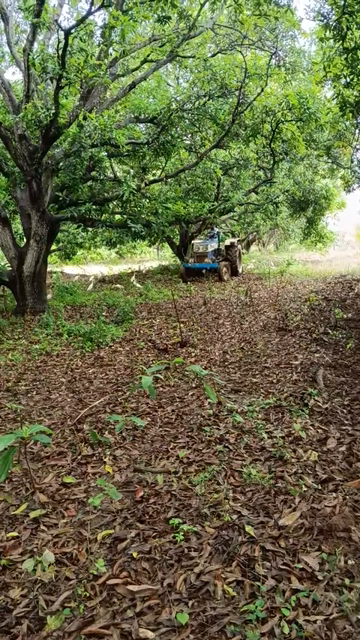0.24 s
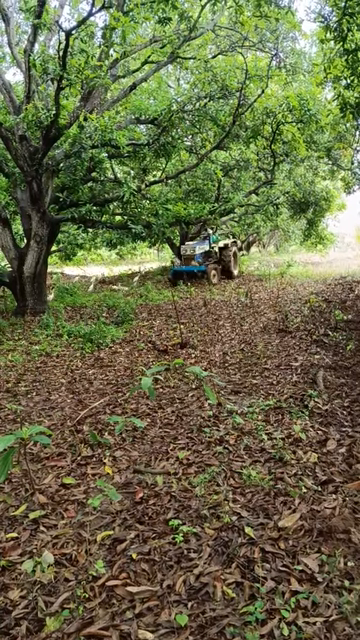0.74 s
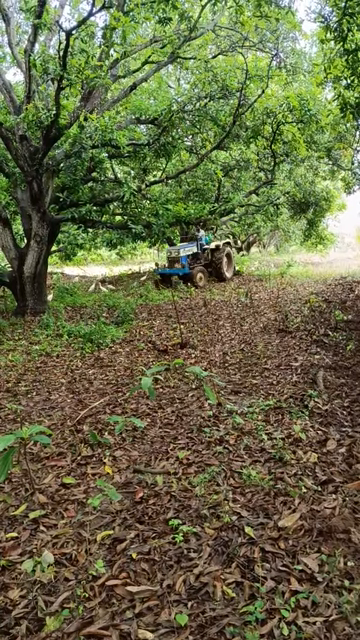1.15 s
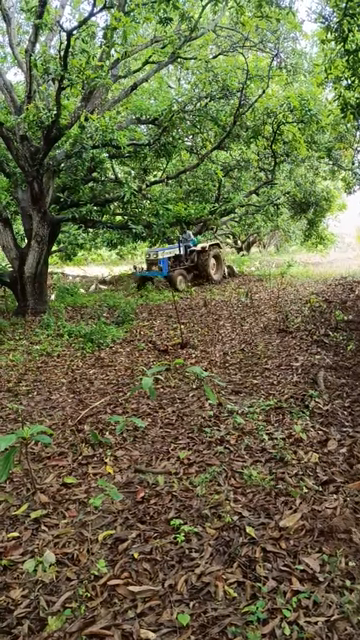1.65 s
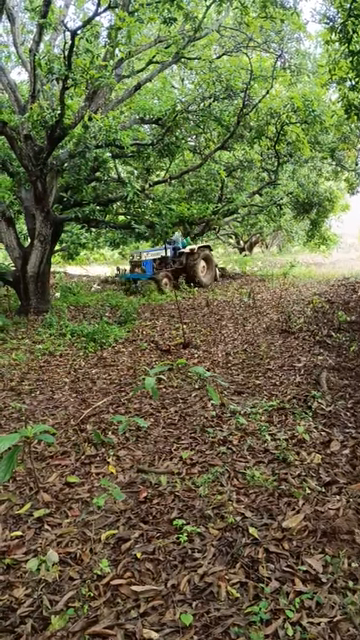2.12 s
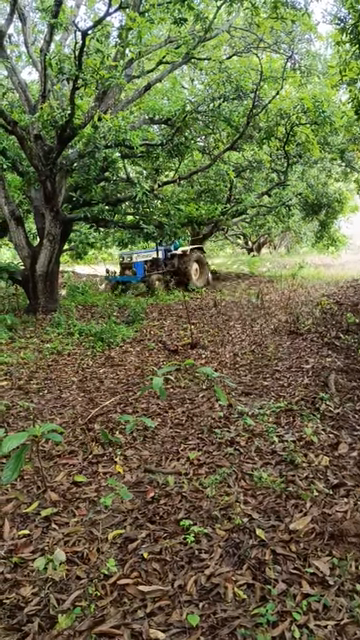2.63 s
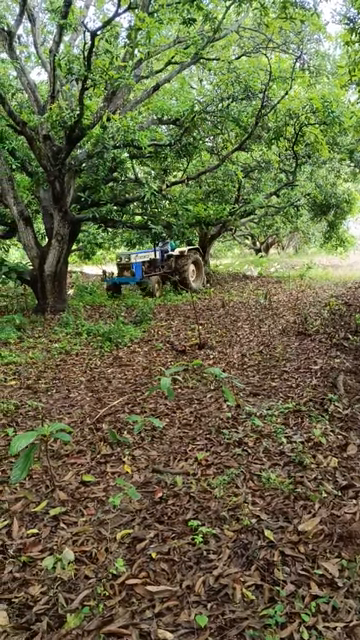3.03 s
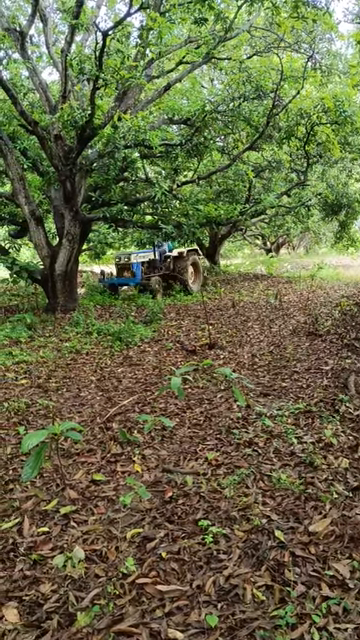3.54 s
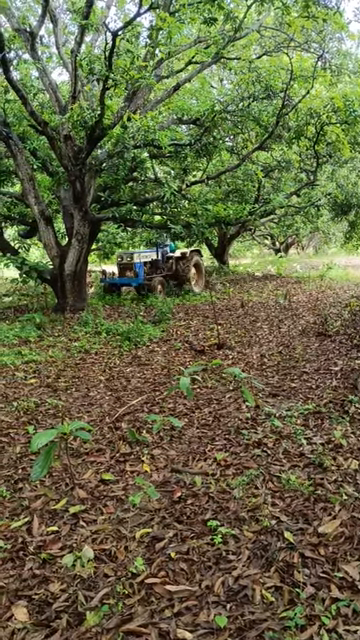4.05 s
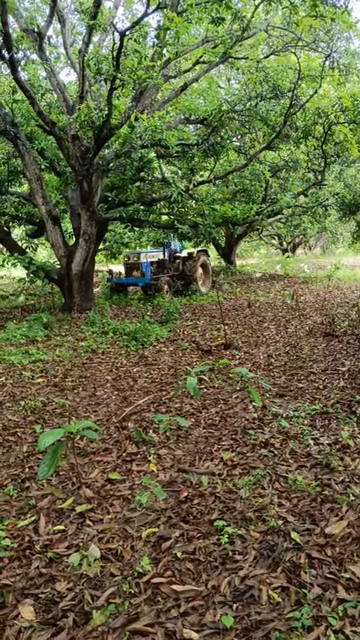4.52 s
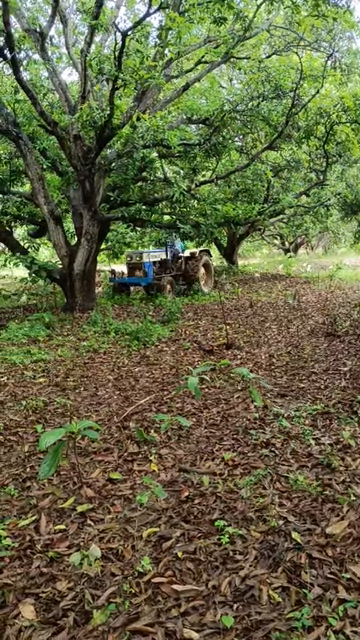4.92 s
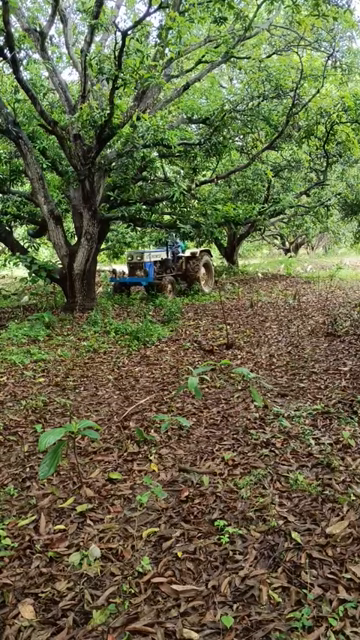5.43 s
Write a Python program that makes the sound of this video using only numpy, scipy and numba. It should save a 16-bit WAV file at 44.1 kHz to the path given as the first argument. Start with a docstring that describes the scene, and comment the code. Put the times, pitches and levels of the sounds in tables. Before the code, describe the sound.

A diesel tractor works under trees, heard in stereo from a distance on a phone. Loud knocking and a slowing, recovering exhaust beat open it; the engine then hunts in pulses, panels buzz, earth rumbles and a gritty crunch bursts midway. Last hard knocks come before the load releases, leaving a weaker steady throb, fan and valve rustle, and one dry twig tick.

```python
"""A small diesel tractor works under orchard trees some way off, heard through a phone's two microphone ports.
It opens in a hard pull: the exhaust throbs in clean orders of a sagging firing rate, hard knocks ring the block,
and the engine clatters brightly. It turns side-on, the governor hunts, and discs turn the earth with thumps,
buzzing panels and one wide crunch. Then the load drops: the knock fades out, the throb weakens, running gear rustles
on, and a twig ticks. Orders are swept sines; the rest is noise, impulses through resonances, and short decaying sines."""
import sys
import numpy as np
from scipy import signal
from scipy.fft import rfft, irfft
from scipy.io import wavfile
from scipy.ndimage import uniform_filter1d
from numba import njit

SR = 44100
rng = np.random.default_rng(int(sys.argv[2]) if len(sys.argv) > 2 else 0)


def generate_wav(signal):
    """Clip the signal to [-1, 1] and save it as 16-bit WAV at the path in sys.argv[1]."""
    frames = np.transpose(np.atleast_2d(signal))
    scaled = np.clip(frames, -1, 1) * 32767
    pcm = np.round(scaled).astype(np.int16)
    wavfile.write(sys.argv[1], SR, pcm)


N = 250047


def undb(db):
    """Decibels to an amplitude factor."""
    return 10 ** (np.asarray(db) / 20)


def seconds():
    """The time of every sample."""
    return np.arange(N) / SR


def curve(table):
    """Columns of a (seconds, value, ..) table, drawn as straight lines with one value a sample."""
    s, *columns = np.transpose(table)
    return [np.interp(seconds(), s, column) for column in columns]


def ramp(span):
    """0 before the span, 1 after it."""
    return np.interp(seconds(), span, (0, 1))


def on_bins(table, column=1):
    """One column of a (Hz, ..) table on the transform bins, along log frequency."""
    rows = np.array(table, float)
    bins_hz = np.fft.rfftfreq(N, 1 / SR)
    return np.interp(np.log(bins_hz + 1), np.log(rows[:, 0]), rows[:, column])


def unit(x):
    """Scale to rms 1."""
    return x / np.sqrt(np.mean(x ** 2))


def colour(x, table):
    """Filter with a (Hz, dB) outline; rms 1."""
    return unit(irfft(rfft(x) * undb(on_bins(table)), N))


def ring(x, hz, width_hz):
    """One fixed resonance, gain 1 at its centre."""
    return signal.lfilter(*signal.iirpeak(hz, hz / width_hz, SR), x)


def steep_ring(x, hz, width_hz):
    """The same resonance twice over, for steeper skirts."""
    return ring(ring(x, hz, width_hz), hz, width_hz)


@njit
def glide(x, hz, width_hz):
    """State-variable band-pass whose centre moves every sample."""
    y, b, l = np.empty(len(x)), 0., 0.
    for i in range(len(x)):
        g, k = np.tan(np.pi * hz[i] / SR), width_hz / hz[i]
        v = (b + g * (x[i] - l)) / (1 + g * (g + k))
        b, l, y[i] = 2 * v - b, l + 2 * g * v, k * v
    return y


def part(x, hz, width_hz):
    """A steep moving resonance on each path; rms 1."""
    width_hz = float(width_hz)
    return unit(np.array([glide(glide(path, hz, width_hz), hz, width_hz) for path in np.atleast_2d(x)]))


def walk(rate):
    """Random levels held 1 / rate s and slewed twice; spread near 1."""
    k = int(SR / rate)
    steps = np.repeat(rng.standard_normal(N // k + 1), k)
    return 1.3 * uniform_filter1d(uniform_filter1d(steps, k), k)[:N]


def noise():
    """Two unrelated noises: the path straight ahead and the scatter off trunks and ground."""
    return rng.standard_normal((2, N))


def grains(spread_db):
    """Noise broken into 1.2 ms grains of unequal size."""
    k = int(.0012 * SR)
    size = np.repeat(rng.exponential(size=N // k + 1), k)[:N]
    return noise() * undb(spread_db * size)


# The governor cuts fuel, then lets it surge. Each row: cut in seconds, exhaust cut in dB, exhaust surge in dB,
# knock cut in dB, knock surge in dB; the exhaust figures are swings that each order takes a share of.
FUEL_HUNT = [(-.2, -11, 2, -24, -28.5), (1.057, -5, 2, -28, -27), (1.27, -1.5, -0.5, -28.5, -29.5),
             (1.492, -10, -1, -48, -25.5), (1.686, -5.5, 0, -45, -28.5), (1.9, -5.5, -0.5, -36, -28.5),
             (2.138, -5, 0.5, -35, -25), (2.385, -9.5, 2.5, -39, -24), (2.625, -12, 1, -40, -32),
             (2.86, -7.5, 0.5, -35, -26), (3.124, -0.5, 1, -33, -27), (3.452, -4.5, 2, -41, -22),
             (3.716, -4, 2.5, -34.5, -23.5), (3.87, 7, -7, -35.5, -37), (3.95, 2, 4.5, -46, -25),
             (4.39, -1.5, 1, -39, -38), (5.8, -8, 0, -44, -44)]
RISE_S, LONGEST_FALL_S = 0.069, 0.21


def governor(cut, surge, lag_s, longest_fall_s):
    """Level between one pair of columns (sharp cuts, round surges), and the level of the running surge."""
    cut_s, cut_db, surge_db = np.transpose(FUEL_HUNT)[[0, cut, surge]]
    t = seconds() - lag_s
    k = np.clip(np.searchsorted(cut_s, t) - 1, 0, len(cut_s) - 2)
    fall_s = np.clip(np.diff(cut_s)[k] - RISE_S, RISE_S, longest_fall_s)
    rise, fall = (t - cut_s[k]) / RISE_S, (cut_s[k + 1] - t) / fall_s
    opening = np.sin(np.pi / 2 * np.clip(np.minimum(rise, fall), 0, 1))
    low_db = np.where(rise < fall, cut_db[k], cut_db[k + 1])
    return low_db + opening * (surge_db[k] - low_db), surge_db[k]


# Exhaust once the hard pull is over. Each row: order, hunting level in dB, unloaded level in dB,
# share of the fuel swing (0 or more).
EASED_ORDERS = [(2, -27.4, -34, 1.0), (3, -21.2, -25.4, .72), (4, -25.8, -45, 1.3), (5, -37.5, -36, .8),
                (6, -44, -40.5, 0), (7, -39.5, -51, .2)]
# Weak orders that shadow another. Each row: order, the order it follows, level against it in dB.
WEAK_ORDERS = [(8, 7, -8)]
# Silencer in the hard pull. Each row: frequency in Hz, level in dB, lag in turns.
SILENCER = [(45, -31.5, 0), (65, -26.5, 0), (100, -23.5, 0), (125, -24, .16), (150, -24.5, .58),
            (175, -26.5, 1.15), (200, -30, 1.85), (225, -39, 2.4), (260, -48, 3.1)]
# How the upper orders swell and fade in the hard pull. Each row: time in seconds, gain of the fifth,
# sixth and seventh order in dB.
UPPER_ORDERS = [(0, -3, 1, 0), (.2, 1, 3, 1), (.3, 2, -1, -4), (.42, -6, -5, -1), (.54, -2, -6, -3),
                (.7, -1, 2.5, 2), (.94, -5, 5, 2), (1, -3, -1, -12)]
# How far the fourth order runs ahead of the lower ones, higher orders by more. Each row: time in seconds, turns.
ORDER_SWEEP = [(1.25, -.22), (1.55, -.37), (1.8, -.37), (2.2, -.22), (3.7, -.22), (3.84, -.42), (3.97, .27)]
# Each entry: order, turns it trails once unloaded.
IDLE_LAG = {5: .2, 6: .1}
PULL_ENDS_S, UNLOADS_S = (.85, 1.3), (3.85, 3.95)
THROB_TURN, PIPE_LAG_TURNS = .64, .42
LUG_HZ, LUG_DB_PER_HZ = 27, 2.8  # even orders thin out as the firing rate sags below this
PUSH_DB_PER_HZ_S = .05  # each step above the third order gains this while the engine picks up speed
LEAD_TURNS_PER_DB, LEAD_S = .022, .02  # the throb runs ahead as the fuel is cut
# as the load drops the throb passes through two nulls, inverted between them
FLIP_S, FLIP_EDGE_S = (3.875, 3.955), .03


def exhaust(turns, hz):
    """Clean orders of the firing rate; the silencer smears them over the cycle, differently with load."""
    fuel_db, _ = governor(1, 2, 0, LONGEST_FALL_S)
    push = uniform_filter1d(np.maximum(np.gradient(hz) * SR, 0), size=SR // 8)
    eased, unloaded = ramp(PULL_ENDS_S), ramp(UNLOADS_S)
    pipe_hz, pipe_db, pipe_lag = np.transpose(SILENCER)
    upper = dict(zip((5, 6, 7), curve(UPPER_ORDERS)))
    db = {}
    for k, hunting_db, unloaded_db, share in EASED_ORDERS:
        pull_db = np.interp(k * hz, pipe_hz, pipe_db) + upper.get(k, 0)
        pull_db = pull_db - (1 - k % 2) * LUG_DB_PER_HZ * np.maximum(LUG_HZ - hz, 0)
        pull_db = pull_db + PUSH_DB_PER_HZ_S * max(k - 3, 0) * push
        eased_db = hunting_db + unloaded * (unloaded_db - hunting_db) + share * fuel_db
        db[k] = pull_db + eased * (eased_db - pull_db)
    db.update({k: db[like] + against_db for k, like, against_db in WEAK_ORDERS})

    sweep, = curve(ORDER_SWEEP)
    lead = -LEAD_TURNS_PER_DB * eased * (1 - unloaded) * np.roll(fuel_db, -int(LEAD_S * SR))
    throb = 0
    for k in db:
        turn = k * (turns - PIPE_LAG_TURNS) + THROB_TURN + lead
        turn = turn + eased * sweep * (k - 2) * (k - 3) / 2
        turn = turn - unloaded * IDLE_LAG.get(k, 0)
        turn = turn - (1 - eased) * np.interp(k * hz, pipe_hz, pipe_lag)
        flutter_db = (.6 if k < 4 else 1.6) * walk(25.3)
        throb = throb + np.sqrt(2) * undb(db[k] + flutter_db) * np.sin(2 * np.pi * turn)
    t = seconds()
    flip = np.tanh((t - FLIP_S[0]) / FLIP_EDGE_S) * np.tanh((t - FLIP_S[1]) / FLIP_EDGE_S)
    return flip * np.minimum(t / 0.016, 1) * throb


# Block and panels. Each row: pitch in Hz, nominal width in Hz, blow in relative dB, rattle in relative dB,
# gain in dB while the tractor faces the phone.
BLOCK_PARTS = [(670, 130, -16, -14, 1.5), (877, 55, -8.5, -14, -4), (1374, 61, -5, -7.5, 1),
               (1810, 106, -14, -10, 6), (2389, 137, -10.5, 0.5, 3.5), (3055, 277, -24, 4, 6),
               (3424, 210, -34, -2.5, 5), (3800, 390, -34, 1.5, 5.5), (4095, 410, -44, -14, -3),
               (4840, 120, -35, -22, 1), (5540, 550, -36, -13.5, 11), (6100, 230, -45, -17.5, 14.5)]
# Pitch of the block above 1 kHz. Each row: time in seconds, factor.
RING_PITCH = [(0, 0.93), (.5, 1), (.9, 0.98), (1.3, 0.941), (3.1, 0.94), (3.6, 0.97)]
# How far the tractor faces the phone before it turns side-on. Each row: time in seconds, share 0-1.
FACING = [(.95, 1), (1.3, 0.3), (1.6, 0.08)]
# The clatter thickens as the engine recovers speed. Each row: time in seconds, gain in dB.
PULL_SWELL = [(0, 1.5), (.45, 3), (.65, 5.5), (.9, 3.5), (1.05, -4), (1.15, -1)]
# Colour of escaping gas. Each row: frequency in Hz, relative level in dB per Hz.
GAS_COLOUR = [(3000, -12.5), (4500, 3.5), (6800, -6.5), (7800, 1), (10300, -3), (12500, -11),
              (15500, -15.5)]
KNOCK_LAG_S, KNOCK_FALL_S, KNOCK_ENDS_S = 0.00095, 0.34, 4.02
SCATTER_LAG_S, BLOW_SPREAD_S = .0012, .003
# each part's pitch drifts, and each firing finds a neighbouring mode (shares of its pitch)
WANDER, JUMP = .012, .02
GAS_DB, GAS_SWING, GAS_FACING_DB = -13, 0.37, 6.5  # hiss against the knock; it follows the cuts only in part


def knock(turns):
    """Each firing strikes the block once, loose panels rattle after it, and escaping gas hisses and spits."""
    charge_db, surge_db = governor(3, 4, KNOCK_LAG_S, KNOCK_FALL_S)
    swell_db, = curve(PULL_SWELL)
    charge_db, surge_db = charge_db + swell_db, surge_db + swell_db
    drop_db = uniform_filter1d(charge_db - surge_db, size=SR // 30)
    facing = np.clip(curve(FACING)[0], 0, 1)
    cycle, phase = np.divmod(turns, 1)
    at = np.flatnonzero(np.diff(cycle))
    which = (cycle - cycle[0]).astype(int)
    # a firing's charge sets the level until the next one
    last = np.r_[0, at][which]
    level_db = uniform_filter1d(charge_db[last], size=SR // 500)

    rattle = noise()
    kick = np.exp(-phase / .3) * (1 - np.exp(-phase / .04))
    pitch_now, = curve(RING_PITCH)
    block = 0
    for hz, width_hz, blow_db, rattle_db, facing_db in BLOCK_PARTS:
        size, late = rng.standard_normal(len(at)), rng.random(len(at))
        jump = rng.standard_normal(len(at) + 1)
        # the blow reaches each part up to 3 ms late, never quite alike
        struck = np.minimum(at + (BLOW_SPREAD_S * SR * late).astype(int), N - 1)
        firing = np.zeros(N)
        firing[struck] = undb(charge_db[at] + 3.2 * size)
        pitch = hz * (pitch_now if hz > 1000 else 1) * (1 + WANDER * walk(6) + JUMP * jump[which])
        blow = part(firing, pitch, width_hz)[0]
        blow = np.array([blow, np.roll(blow, int(SCATTER_LAG_S * SR))])
        # low parts rattle in puffs; high ones run on between firings, most of all in the hard pull
        depth = 3.2 if hz < 2600 else 2.0 - 1.1 * facing
        shake = part(rattle * (1 + depth * kick), pitch, 1.16 * width_hz) * unit(undb(level_db))
        gain = undb(facing * facing_db + 2.15 * walk(7.12))
        block = block + gain * (undb(blow_db) * blow + undb(rattle_db) * shake)

    hiss = colour(grains(0.62) * (3 + np.exp(-phase / 0.091)), GAS_COLOUR)
    hiss_db = GAS_DB + GAS_FACING_DB * facing - GAS_SWING * drop_db
    hiss_db = hiss_db + uniform_filter1d(level_db, size=SR // 30) + walk(30.3)
    fade = np.clip((KNOCK_ENDS_S - seconds()) / 0.076, 0, 1)  # no load, no knock
    loud = np.sqrt(np.mean(undb(level_db) ** 2))
    return fade * (loud * unit(block) + undb(hiss_db) * hiss)


# The bright 3.4-4 kHz part of the engine clatter, strongest in the hard pull. Each row: time in seconds, level in dB.
BRIGHT_CLATTER_LEVEL = [(0, -32.5), (.15, -25.5), (.35, -33), (.65, -27.5), (1.03, -35), (1.2, -37.5),
                        (1.5, -46), (1.7, -43.5), (2, -52)]
# Its resonances. Each row: centre in Hz, nominal width in Hz.
BRIGHT_CLATTER_BANDS = [(3420, 470), (4050, 440)]


def bright_clatter(turns):
    """Coarse grains in two wide drifting resonances, pushed a little by each firing."""
    push = 1 + 0.27 * np.exp(-(turns % 1) / 0.26)
    bands = 0
    for hz, width_hz in BRIGHT_CLATTER_BANDS:
        bands = bands + part(grains(1.5) * push, hz * (1 + .03 * walk(12)), width_hz)
    return undb(curve(BRIGHT_CLATTER_LEVEL)[0]) * unit(bands)


# Colour of fan, gears and valves. Each row: frequency in Hz, relative level in dB per Hz.
GEAR_COLOUR = [(200, -44), (460, -17), (590, -8), (694, -3), (1000, -11.5), (1200, -2), (1580, -9),
               (2200, -3), (3400, -6.5), (5600, -17), (9350, -21.5), (12300, -25), (15300, -35)]
# Their level. Each row: time in seconds, level in dB.
GEAR_LEVEL = [(0, -36.5), (2.5, -36), (3.9, -35.5), (4.3, -37.5), (5.67, -35.5)]


def running_gear(turns):
    """Fan and gears rustle steadily; valves tap three times a firing cycle, the first tap the loudest."""
    taps = .8 * np.exp(-(3 * turns % 1) / .5) + .7 * np.exp(-(turns % 1) / .4)
    steady = noise()
    tapped = signal.sosfilt(signal.butter(2, 2000, fs=SR, output="sos"), taps * steady)
    gear = colour((0.6 * steady + tapped) * undb(.8 * walk(18)), GEAR_COLOUR)
    return undb(curve(GEAR_LEVEL)[0]) * gear


# Colour of the chassis rumble. Each row: frequency in Hz, relative level in dB per Hz.
RUMBLE_COLOUR = [(20, -38), (45, -9), (170, -2.5), (260, -4.5), (400, -73)]
RUMBLE_DB = -42


def chassis():
    """A steady low rumble of shaped noise."""
    return undb(RUMBLE_DB) * colour(noise(), RUMBLE_COLOUR)


# Colour of discs turning earth. Each row: frequency in Hz, relative level in dB per Hz.
SOIL_COLOUR = [(120, -1.5), (220, -2), (330, -4), (450, -17), (700, -57)]
# Its level. Each row: time in seconds, level in dB.
SOIL_LEVEL = [(0, -45.5), (1, -43.5), (1.9, -36), (2.5, -33), (3.6, -37), (4.4, -47), (5.67, -44)]


def soil():
    """Discs turning earth: low noise of uneven strength."""
    return undb(curve(SOIL_LEVEL)[0]) * colour(noise() * undb(2.5 * walk(9)), SOIL_COLOUR)


# Firings that stand out. Each row: start in seconds, nominal peak in dB, ringing pitch in Hz.
HARD_KNOCKS = [(.030, -18, 3790), (0.066, -14, 2380), (0.097, -15, 2350), (0.129, -15, 3030),
               (.354, -16.5, 3864), (.479, -16.5, 2420), (.670, -17, 3780), (0.744, -20, 1370),
               (0.873, -20, 1860), (1.098, -25, 2970), (1.161, -25.5, 2290), (1.193, -18.5, 3590),
               (1.316, -23, 1293), (1.528, -27, 2200), (1.558, -20.5, 2150), (1.736, -33, 1274),
               (1.768, -23.5, 2720), (1.952, -29, 2450), (2.410, -34, 3340), (3.209, -20.5, 2900),
               (3.486, -21.5, 2180), (3.514, -31, 3060), (3.549, -18, 2310), (3.577, -17, 3110),
               (3.609, -18.5, 2320), (3.731, -22, 2863), (3.760, -15.5, 2190), (3.817, -20, 2200)]
HARD_KNOCK_T60_S = 0.063
CRACK_DB, CRACK_T60_S = -7, 0.017  # the wide edge against the ring; its decay adds to the knock's own


def hard_knocks():
    """A hard firing rings one mode of the block, part pure and part rough, over a short wide crack."""
    out = np.zeros((2, N))
    age = np.arange(SR // 8) / SR
    rough = rng.standard_normal((len(HARD_KNOCKS), 2, len(age)))
    for (s, db, hz), crack in zip(HARD_KNOCKS, rough):
        pure = np.sin(2 * np.pi * (hz * age + crack[:, :1]))  # random phase on each path
        mode = pure + .45 * unit(steep_ring(crack, hz, 400.))
        mode = mode * (1 - np.exp(-(age / .001) ** 2))
        edge = undb(CRACK_DB - 60 * age / CRACK_T60_S) * unit(ring(crack, 2640.0, 2500.))
        out[:, int(s * SR):][:, :len(age)] += undb(db - 60 * age / HARD_KNOCK_T60_S) * (mode + edge)
    return out


# Dull thumps from the implement, and two low engine knocks near 700 Hz. Each row: start in seconds,
# nominal peak in dB, pitch in Hz.
THUMPS_AND_LOW_KNOCKS = [(1.106, -31.5, 326), (2.669, -20.5, 306.5), (2.93, -21.5, 309), (3.149, -22, 267),
                         (3.543, -24.5, 700), (3.757, -27.5, 692)]


def thumps_and_low_knocks():
    """Each blow rings briefly: a decaying sine with a narrow band of noise on its pitch."""
    out, dull = 0, noise()
    for s, db, hz in THUMPS_AND_LOW_KNOCKS:
        age = np.maximum(seconds() - s, 0)
        envelope = undb(db - 60 * age / 0.16) * (1 - np.exp(-age / 0.0055))
        out = out + envelope * (np.sin(2 * np.pi * hz * age) + .5 * unit(steep_ring(dull, hz, 71.0)))
    return out


# A loose panel buzzes through one surge. Each row: start in seconds, length in seconds up to its fade,
# level in dB, pitch in Hz.
BUZZES = [(1.78, 0.046, -31, 2720), (2.163, 0.1, -34, 3635), (2.411, 0.14, -32.5, 3340)]
BUZZ_WIDTH_HZ, BUZZ_EDGE_S = 150, 0.028  # it swells in half the edge and fades in the whole


def buzzes():
    """Narrow rattles that swell and fade."""
    t, out, shake = seconds(), 0, noise()
    for s, length, db, hz in BUZZES:
        swell = np.minimum(2 * (t - s), s + length + BUZZ_EDGE_S - t) / BUZZ_EDGE_S
        out = out + undb(db) * np.clip(swell, 0, 1) * unit(steep_ring(shake, hz, BUZZ_WIDTH_HZ))
    return out


# A wide burst under the discs. Each row: start in seconds, nominal peak in dB, 60 dB decay in seconds
# of the dull part, of the bright part.
CRUNCHES = [(2.65, -17.5, 0.39, 0.54)]
# Its colour. Each row: frequency in Hz, relative level in dB per Hz.
CRUNCH_COLOUR = [(290, -48.5), (500, -20), (874, -7.5), (1180, -5), (2900, -2.5), (3660, 0), (4500, -7.5),
                 (9280, -13), (15300, -30.5)]
# rise and hold are given below and above the split
CRUNCH_RISE_S, CRUNCH_HOLD_S, CRUNCH_SPLIT_HZ = (0.0045, 0.012), (0.034, .04), 3000
CLANK_HZ, CLANK_DB, CLANK_T60_S = 1220, -16.5, 0.09


def crunches():
    """Grit rises, holds and fades, the bright part later and longer; a disc rings as it begins."""
    out = 0
    grit = colour(grains(.9) * undb(walk(60)), CRUNCH_COLOUR)
    low = signal.sosfiltfilt(signal.butter(2, CRUNCH_SPLIT_HZ, fs=SR, output="sos"), grit)
    clank = unit(ring(noise(), CLANK_HZ, 140.0))
    for s, db, *t60s in CRUNCHES:
        age = np.maximum(seconds() - s, 0)
        for band, rise_s, hold_s, t60 in zip((low, grit - low), CRUNCH_RISE_S, CRUNCH_HOLD_S, t60s):
            rise = 1 - np.exp(-(age / rise_s) ** 2)
            out = out + rise * undb(db - 60 * np.maximum(age - hold_s, 0) / t60) * band
        rise = 1 - np.exp(-(age / CRUNCH_RISE_S[0]) ** 2)
        out = out + rise * undb(CLANK_DB - 60 * age / CLANK_T60_S) * clank
    return out


TWIG_S, TWIG_DB, TWIG_HZ = 5.062, -21, (2400, 3250, 5000)


def twig():
    """One dry tick: a single impulse through three wide resonances, the higher ones weaker."""
    snap = np.zeros((2, N))
    snap[:, int(TWIG_S * SR)] = 1
    tick = sum(2400 / hz * steep_ring(snap, hz, 600.) for hz in TWIG_HZ)
    return undb(TWIG_DB) * tick / tick.max()


# Between the two ports. Each row: frequency in Hz, side against mid in dB, share of side in step with mid,
# share a quarter turn ahead; both shares are held within .7 either way.
PORT_SPREAD = [(121, -80, 0, -.5), (298, -5, -0.17, -.75), (1100, -3.5, -0.23, -1.4),
               (3260, 2, 0.74, -0.53), (4770, 0, -0.21, -0.85), (8300, 0, -0.1, 0.027)]


def ports(ahead, scatter):
    """Left and right agree in the bass and part ways in the treble, by level, by lag and by chance."""
    alike, lag = (np.clip(on_bins(PORT_SPREAD, column=c), -.7, .7) for c in (2, 3))
    by_chance = np.sqrt(1 - alike ** 2 - lag ** 2)
    share = (alike + 1j * lag) * rfft(ahead) + by_chance * rfft(scatter)
    side = irfft(undb(on_bins(PORT_SPREAD)) * share, N)
    return np.array([ahead + side, ahead - side])


# Engine speed. Each row: time in seconds, firings a second.
FIRING_RATE = [(0.0, 31.2), (.1, 30.3), (0.35, 24.5), (0.49, 24.21), (0.8, 30.11), (0.95, 31.37),
               (1.08, 31.54), (1.43, 33.19), (2.39, 32.52), (2.69, 32.81), (2.86, 32.22), (3.32, 32.83),
               (3.5, 32.02), (3.69, 32.82), (3.8, 35.37), (3.95, 34.81), (4.05, 35.93), (4.4, 36.0),
               (4.6, 35.34), (5.4, 35.43), (5.67, 34.8)]
START_TURN, LEFT_LAG_S = .11, .0001


def scene():
    """One running firing phase drives throb, knock, bright clatter and valves; the rest keep their own times."""
    hz, = curve(FIRING_RATE)
    turns = START_TURN + np.cumsum(hz) / SR
    # the throb reaches the right port first
    port_lag_s = np.array([[.5], [-.5]]) * LEFT_LAG_S
    throb = exhaust(turns - port_lag_s * hz, hz)
    tractor = knock(turns) + bright_clatter(turns) + running_gear(turns) + chassis()
    events = hard_knocks() + thumps_and_low_knocks() + buzzes() + crunches() + twig()
    return throb + ports(*(tractor + soil() + events))


def record(dry):
    """The phone cuts the top with a steep elliptic low-pass at 15.4 kHz."""
    return signal.sosfilt(signal.ellip(14, .3, 70, 15400, fs=SR, output="sos"), dry)


dry = scene()
out = record(dry)
generate_wav(out)
```